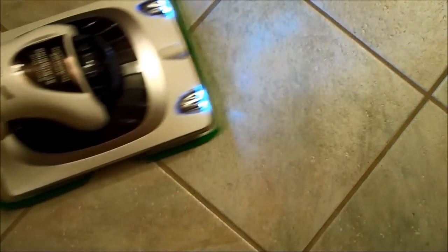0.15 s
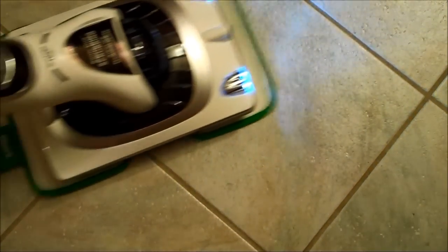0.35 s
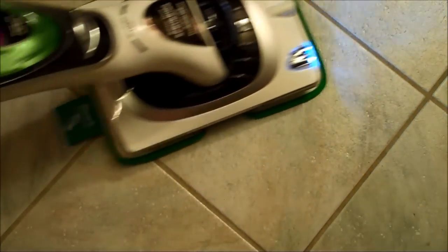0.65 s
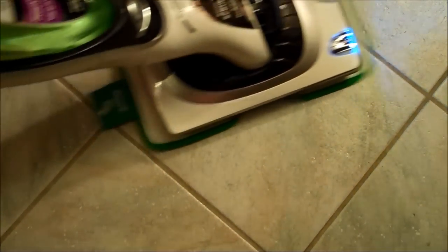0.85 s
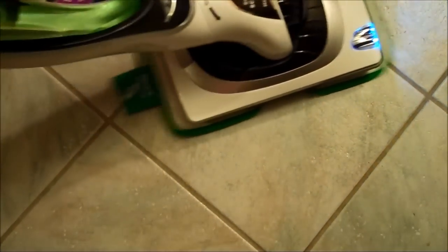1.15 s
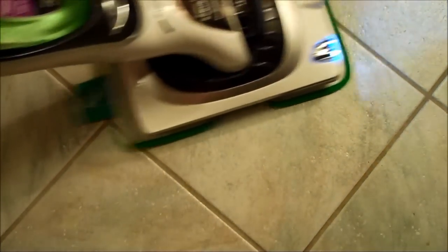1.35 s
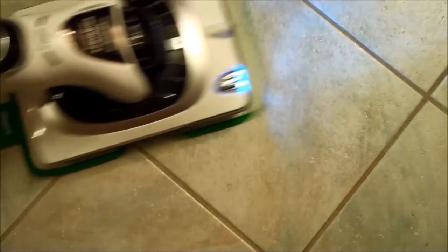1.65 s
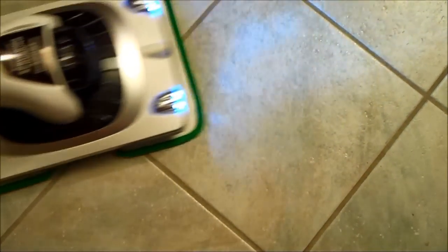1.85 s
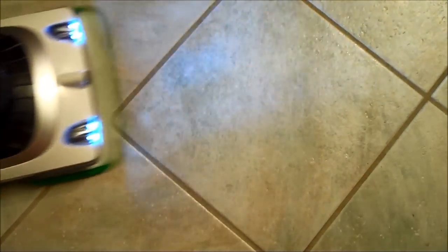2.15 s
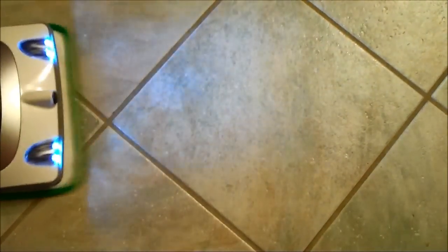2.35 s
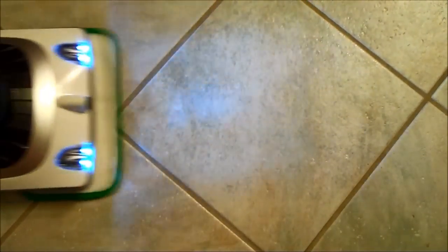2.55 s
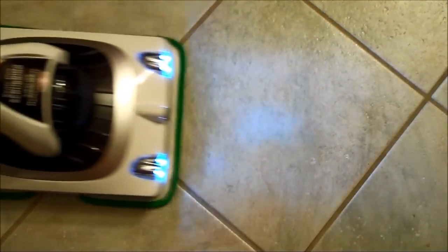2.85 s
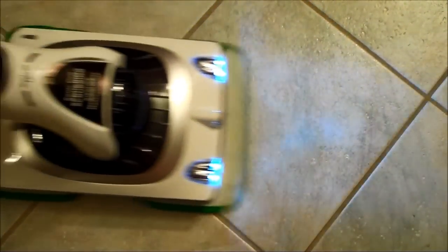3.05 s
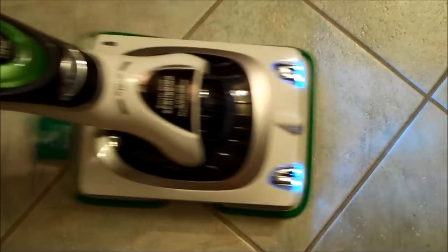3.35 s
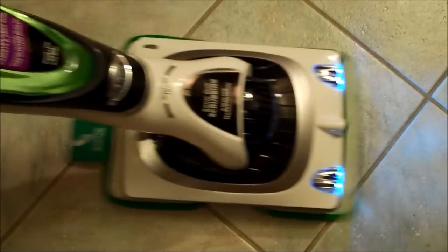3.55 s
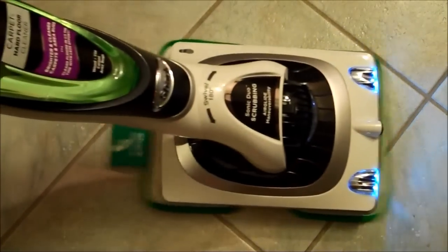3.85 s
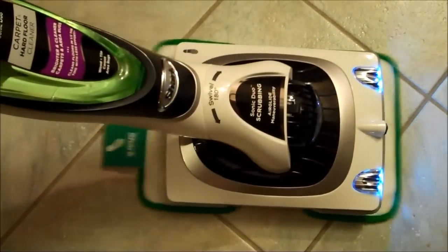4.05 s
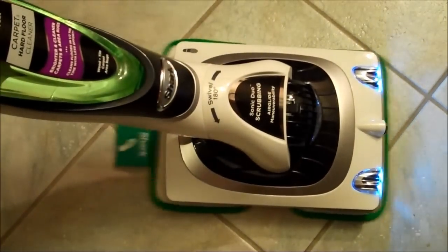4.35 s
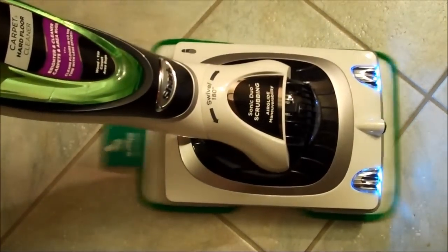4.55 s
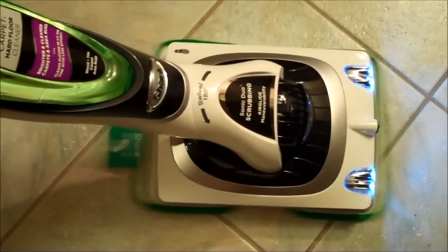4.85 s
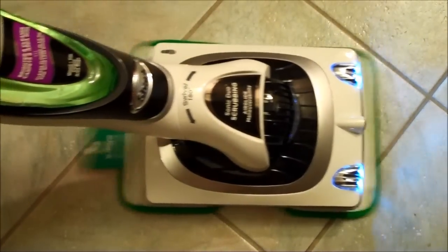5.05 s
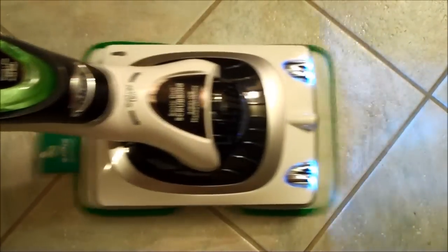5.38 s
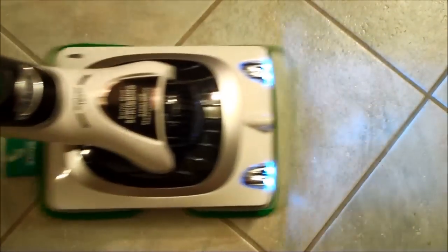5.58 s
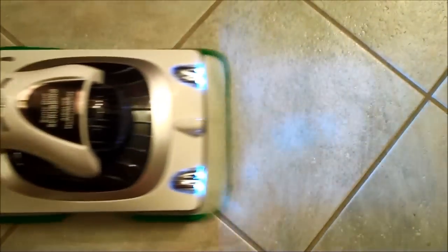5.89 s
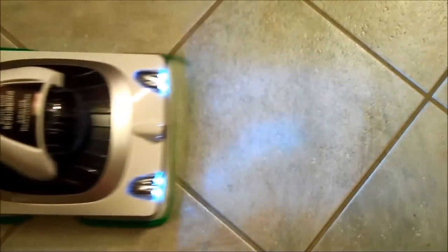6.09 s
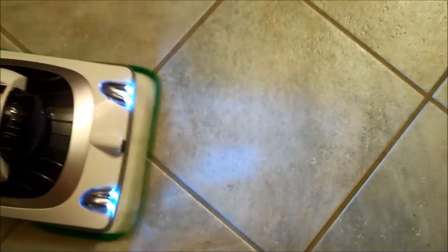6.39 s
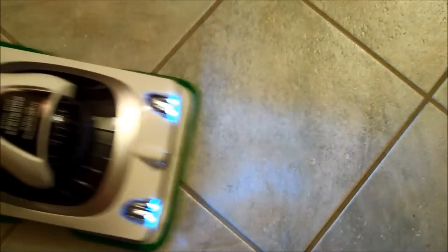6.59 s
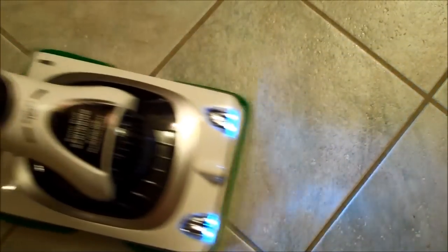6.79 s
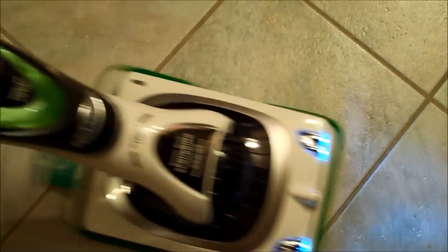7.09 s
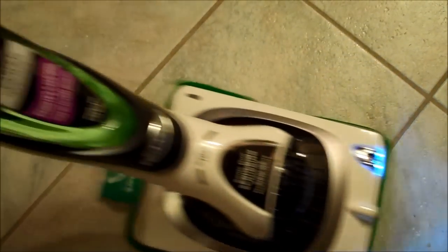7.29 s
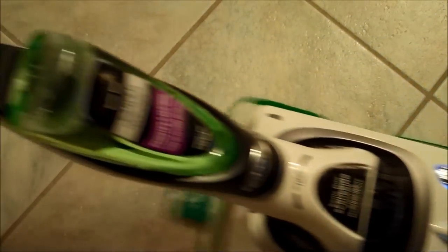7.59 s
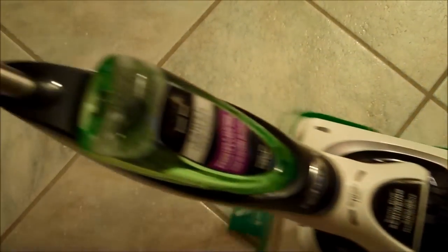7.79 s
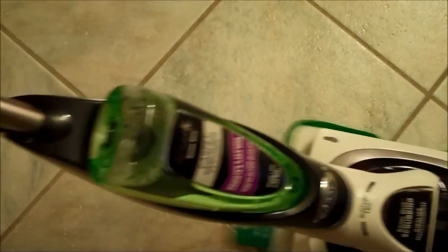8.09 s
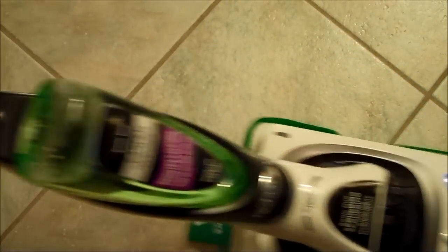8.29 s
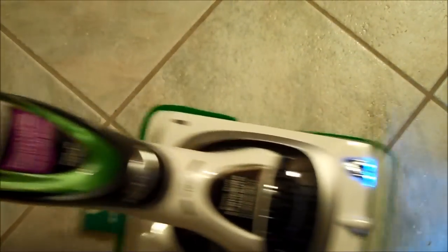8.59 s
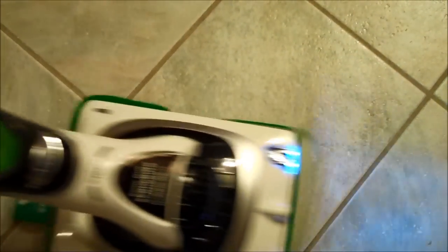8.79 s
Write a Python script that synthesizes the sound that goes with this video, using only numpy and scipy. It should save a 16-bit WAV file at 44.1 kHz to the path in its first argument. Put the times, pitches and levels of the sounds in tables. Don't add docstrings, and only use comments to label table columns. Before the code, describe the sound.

Continuous whirring whine from a scrubbing machine pushed to and fro over a tiled floor, with rapid pad strokes making it warble and chatter. Midway the motor shifts up by several semitones within half a second, growing brighter and louder, then holds to the end. A few tiny grit ticks; short hard-room reverberation, heard from close above.

```python
import sys
import numpy as np
from scipy import signal
from scipy.fft import rfft, irfft, next_fast_len
from scipy.io import wavfile
from scipy.ndimage import uniform_filter1d, map_coordinates

SR = 44100
rng = np.random.default_rng(int(sys.argv[2]) if len(sys.argv) > 2 else 0)


def gain_from_decibels(decibels):
    exponent = np.asarray(decibels, float) / 20
    return 10 ** exponent


def put_to_file(sound):
    columns = np.atleast_2d(sound).T
    safe = np.clip(columns, -1, 1)
    whole_steps = np.round(safe * 32767)
    wavfile.write(sys.argv[1], SR, whole_steps.astype(np.int16))


N = 393813

# time in seconds, pad strokes per second.
CRANK_SPEED = [(0, 11.818), (.69, 11.702), (1.92, 12.041), (2.75, 11.456), (3.07, 11.858), (4.5, 11.669),
               (4.56, 11.669), (4.8, 14.41), (5.02, 15.872), (6.21, 16.167), (6.42, 15.794), (8.53, 15.979),
               (9, 16.152)]
STROKE_SWING = [(0, .9), (.15, .7), (.24, .1), (.33, -1.25), (.45, -1.15), (.62, -.45), (.78, .3),
                (.9, .75)]
# time in seconds, whine level in dB,
# drop in dB while unloaded at top speed, 2nd overtone level in dB.
MESH_LEVELS = [(0, -34, 6, -38), (.5, -34.5, -8, -38), (.95, -30.5, 5, -40), (1.6, -34.5, -9.5, -39),
               (2.25, -33.5, -1.5, -36.5), (2.65, -35, 12, -38.5), (3.3, -33, -0.5, -38),
               (3.65, -31.5, 0.5, -37), (4.55, -30.5, 6.5, -37.5), (4.8, -26, 2, -34.5),
               (5.45, -24, 33, -35), (6.05, -26, 22, -35.5), (6.5, -34, 0.5, -37), (7.0, -26, 32, -36),
               (7.25, -30, 3.5, -35.5), (7.8, -27.5, 4.5, -34), (8.33, -30.5, 2, -34),
               (8.6, -26.5, 10.5, -34.5)]
# multiple of the tooth rate, level in dB when slow, level in dB when fast.
HIGH_OVERTONES = [(4, -63.5, -64.5), (6, -67.5, -64), (8, -69, -67)]
# frequency in Hz, gain in dB.
SHELL_GAIN = [(800, -5), (1100, 0), (1500, 2), (2050, -2.5), (2280, -3), (2390, 7.5), (2500, -7.5),
              (2800, -10), (3100, -2), (4300, 6), (4650, -2), (6000, -2), (13000, 0.5)]
# frequency in Hz, width in Hz, level in dB.
HOUSING_MODES = [(134, 12, -19), (191.3, 26, -18.5), (253.8, 19, -11.5), (381.9, 18.6, 3.5), (491, 19, 0),
                 (625.7, 32.4, 3), (1130, 110, -9.5), (2335, 38, -5)]
# frequency in Hz, level in dB per Hz.
BED_SPECTRUM = [(100, -63), (160, -38), (320, -16.5), (400, -2.5), (1300, 2), (1900, -6.5), (3500, -10.5),
                (4600, -17.5), (5500, -36), (14000, -47)]
# frequency in Hz, level in dB per Hz.
HISS_SPECTRUM = [(3000, -40), (5000, -1), (7000, 0), (8400, -2), (9300, -2.5), (10100, -4.5), (11500, 2),
                 (13000, -4.5), (14000, -9.5)]
# time in seconds, peak in dB, spray t60 in seconds, spray level in dB.
GRIT_CLICKS = [
    (.3776, -36, .03, -18),
    (4.3631, -32.5, .07, -10),
    (5.9709, -36, .13, -8),
]
# frequency in Hz, t60 in seconds.
ROOM_DECAY = [(200, 0.092), (1500, 0.26), (5000, 0.094), (12000, 0.045)]


def crank():
    slow_hz, fast_hz = 1120, 1500
    rate, = curves(CRANK_SPEED)
    strokes = 0.894 + np.cumsum(rate) / SR
    share, speed = np.transpose(STROKE_SWING)
    swing = uniform_filter1d(np.interp(strokes % 1, share, speed, period=1), size=200)
    mean_hz = 91.8 * rate + 36.04
    depth_hz = 86 * (slow_hz / mean_hz) ** 1.35 * (1 + 0.12 * wobble(9))
    fast = np.clip((mean_hz - slow_hz) / (fast_hz - slow_hz), 0, 1)
    return strokes, mean_hz + depth_hz * swing + 5 * wobble(40), fast


def whine(strokes, tooth_hz, fast):
    first_db, drop_db, second_db = curves(MESH_LEVELS)
    slack = bump(strokes, 0.08, sharp=2.5) + 0.28 * bump(strokes, 0.53, sharp=6)
    first_db = first_db + 2 - drop_db * slack + patchy(1.3, rate=55)
    second_db = second_db - (2.3 + 4 * fast) * bump(strokes, 0.17, sharp=3.8)
    second_db = second_db + patchy(3.5 - 1.9 * fast, rate=60)
    third_db = setting((-47, -55.5), fast) + 1.8 * wobble(2.96)
    third_db = third_db - 2.2 * bump(strokes, 0.25, sharp=3.4) + patchy(5.5 - 1.9 * fast, rate=110)
    overtones = [(1, first_db), (2, second_db), (3, third_db)]
    for order, slow_db, fast_db in HIGH_OVERTONES:
        overtones.append((round(order), setting((slow_db, fast_db), fast) + patchy(4.2, rate=90)))

    turn = 2 * np.pi * np.cumsum(tooth_hz) / SR
    shaft = 0.104 * turn + 1.56 * wobble(12)
    eccentric = 1 + 0.27 * np.cos(shaft) + 0.11 * np.cos(2 * shaft + 2.8 * wobble(12))
    uneven = 0.35 * wobble(250)
    out_of_round = 0.28 * np.sin(shaft + 1.5)
    tones = np.zeros(N)
    for order, db in overtones:
        phase = order * turn + order ** 1.11 * uneven + np.sqrt(order - 1) * out_of_round
        tones += gain_from_decibels(db) * np.sin(phase)
    return filtered(np.sqrt(2) * eccentric * tones, lambda hz: gain_from_decibels(along(SHELL_GAIN, hz)))


def scrub(strokes, fast):
    housing_db = setting((-40, -39), fast)
    hiss_db = setting((-57.5, -56), fast)
    lowered = ramp(7.22, 0.25) - ramp(8.7, 0.47)
    hum_db = setting((-63.5, -53), fast) + 8.5 * lowered
    chatter_db = setting((-51.5, -53.5), fast) - 2 * ramp(1.5, 0.5) * (1 - fast)

    rattle = friction(3 * bump(strokes, 0.33, 0.62) + 1.7 * wobble(60), housing_response)
    bed = friction(0.91 * bump(strokes, 0.26, 2.1), lambda f: gain_from_decibels(along(BED_SPECTRUM, f)))
    hiss_swell_db = 1.4 * bump(strokes, 0.055, 1.2) + 0.5 * wobble(150)
    hiss = friction(hiss_swell_db, lambda f: gain_from_decibels(along(HISS_SPECTRUM, f)))
    handle_hum = friction(0, lambda f: resonance(f, 754, 48) ** 2 + 0.95 * resonance(f, 553.5, 42) ** 2)
    chatter = friction(12 * bump(strokes, 0.33, 1.1), lambda f: resonance(f, 3825, 510) ** 2)

    mix = gain_from_decibels(housing_db - 4.5) * rattle + gain_from_decibels(housing_db + 1.5) * bed + gain_from_decibels(hiss_db) * hiss
    return mix + gain_from_decibels(hum_db) * handle_hum + gain_from_decibels(chatter_db) * chatter


def friction(swell_db, response):
    return unit(filtered(rng.standard_normal(N) * gain_from_decibels(swell_db), response))


def housing_response(f):
    return sum(gain_from_decibels(db) * resonance(f, hz, width) for hz, width, db in HOUSING_MODES)


def grits():
    x = np.zeros(N + SR)
    t = np.arange(-SR // 20, SR // 10) / SR
    for s, db, t60, spray_db in GRIT_CLICKS:
        tick = (t >= 0) * gain_from_decibels(-60 * np.abs(t) / 0.008)
        spray = gain_from_decibels(spray_db - 60 * np.abs(t) / np.where(t < 0, t60, 2 * t60))
        start = round((s + t[0]) * SR)
        x[start:][:len(t)] += gain_from_decibels(db) * (tick + spray) * rng.standard_normal(len(t))
    spectrum = [(2500, -30), (5500, 0), (10000, 0), (13900, -6), (14100, -60)]  # (Hz, dB)
    return filtered(x[:N], lambda hz: gain_from_decibels(along(spectrum, hz)))


def room(x, hop=SR // 2):
    out = np.zeros(N + 3 * SR)
    x = np.pad(x, (hop, 2 * hop))
    for i in range(0, N + hop, hop):
        hz, t, z = signal.stft(rng.standard_normal(SR // 3), SR, nperseg=256)
        decay = gain_from_decibels(-60 * t / along(ROOM_DECAY, hz)[:, None])
        tail = signal.istft(z * decay, SR, nperseg=256)[1]
        faded = x[i:i + 2 * hop] * np.sqrt(np.hanning(2 * hop))
        part = signal.fftconvolve(faded, tail / np.linalg.norm(tail))
        out[i:i + len(part)] += part
    return np.pad(out[hop:], (200, 0))[:N]


def self_noise():
    spectrum = [(20, 5), (45, -5), (110, -8), (400, -16), (14000, -50)]  # (Hz, dB)
    return unit(filtered(rng.standard_normal(N), lambda hz: gain_from_decibels(along(spectrum, hz))))


def suppress_treble(x, gate_db, depth_db):
    hz, _, z = signal.stft(x, SR, nperseg=1024)
    power = uniform_filter1d(np.abs(z) ** 2, size=4, axis=0)
    power = uniform_filter1d(power, size=3, axis=1)
    under = 1 / (1 + (power / gain_from_decibels(2 * gate_db)) ** 6) * (hz > 5000)[:, None]
    return signal.istft(z * gain_from_decibels(-depth_db * under), nperseg=1024)[1][:N]


def resonance(f, hz, width):
    return 1j * f * width / (hz * hz - f * f + 1j * f * width)


def bump(strokes, lag, sharp):
    return np.exp(sharp * (np.cos(2 * np.pi * (strokes - lag)) - 1))


def patchy(depth_db, rate):
    chance = wobble(rate)
    return depth_db * np.where(chance < 0, 1.6, 0.7) * chance


def wobble(rate):
    knots = rng.standard_normal(int(N * rate / SR) + 4)
    return map_coordinates(knots, [np.arange(N) * rate / SR])


def filtered(x, response):
    m = next_fast_len(N + SR // 2)
    return irfft(rfft(x, m) * response(np.fft.rfftfreq(m, 1 / SR)), m)[..., :N]


def unit(x):
    return x / np.sqrt(np.mean(x ** 2) + 1e-20)


def along(points, hz):
    f, v = np.transpose(points)
    return np.interp(np.log(hz + 1), np.log(f + 1), v)


def curves(rows):
    s, *cols = np.transpose(rows)
    return [np.interp(np.arange(N) / SR, s, c) for c in cols]


def setting(pair, fast):
    return pair[0] + (pair[1] - pair[0]) * fast


def ramp(s, length):
    return np.clip((np.arange(N) / SR - s) / length, 0, 1)


def scene():
    strokes, tooth_hz, fast = crank()
    near = whine(strokes, tooth_hz, fast) + grits()
    return (near + gain_from_decibels(-10.5) * room(near) + scrub(strokes, fast))[None]


def top_cut(x):
    return signal.sosfilt(signal.butter(12, 13990, fs=SR, output="sos"), x)


def record(dry):
    bass_cut = [(60, -18), (115, -11), (150, 0)]  # (Hz, dB)
    heard = filtered(dry, lambda hz: gain_from_decibels(along(bass_cut, hz)))
    gated = suppress_treble(heard[0], gate_db=-85.5, depth_db=18)
    mix = gated[None] + gain_from_decibels(-72) * self_noise()
    return top_cut(mix)


dry = scene()
out = record(dry)
put_to_file(out)
```